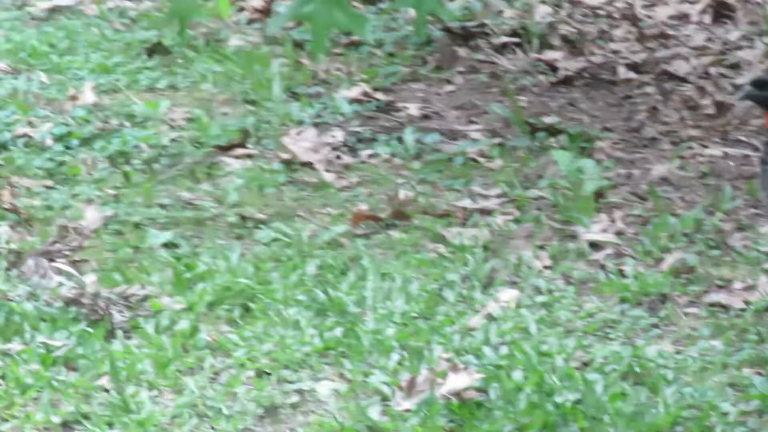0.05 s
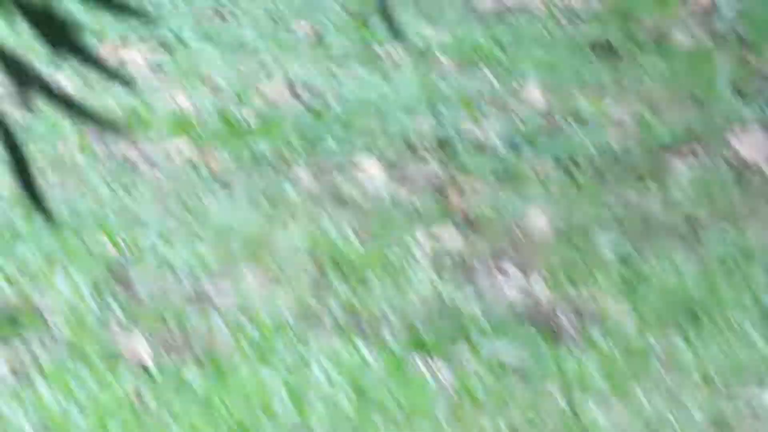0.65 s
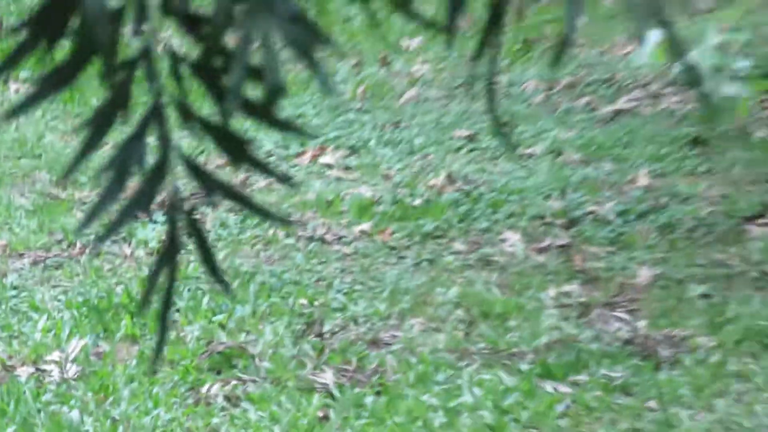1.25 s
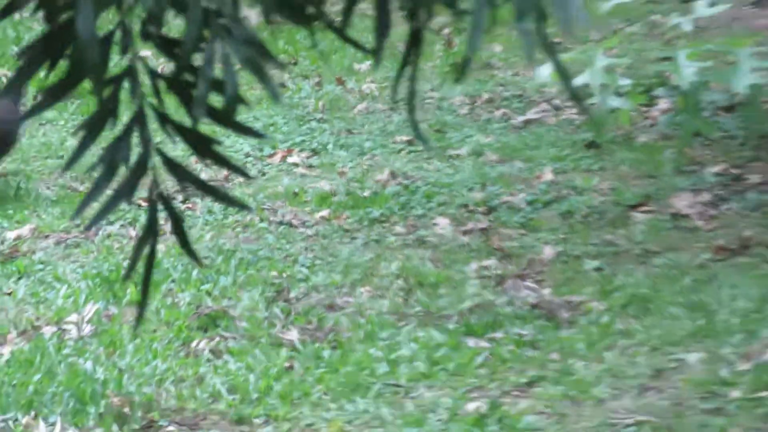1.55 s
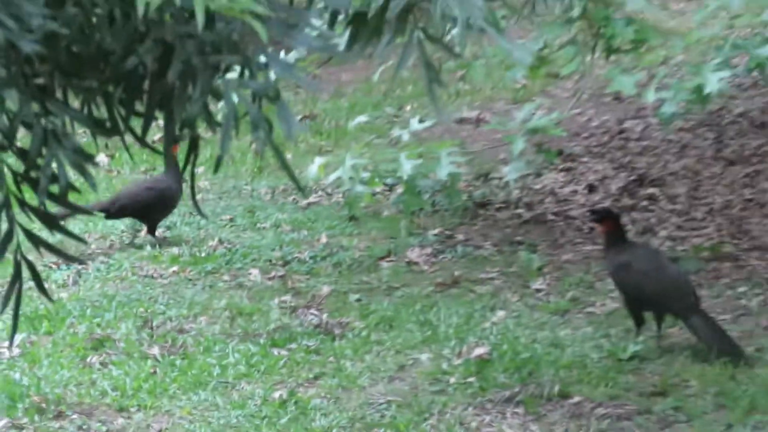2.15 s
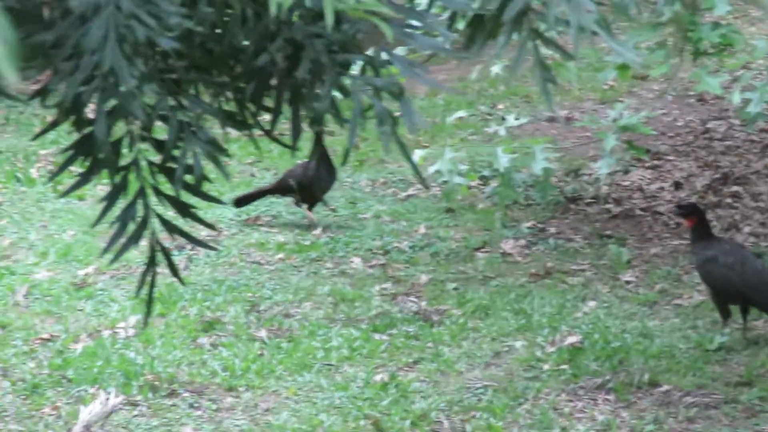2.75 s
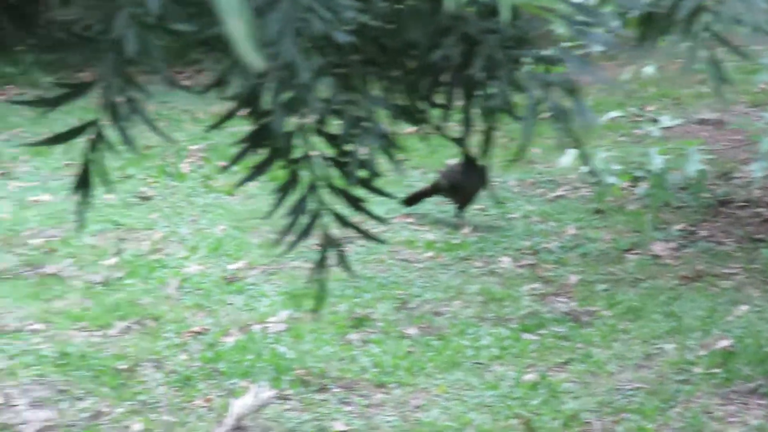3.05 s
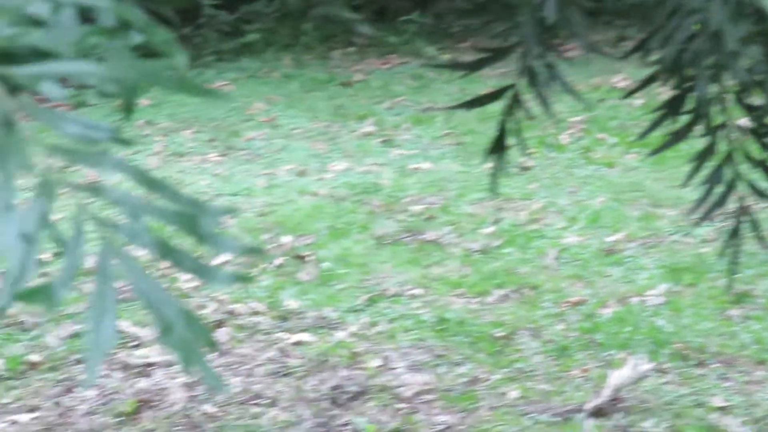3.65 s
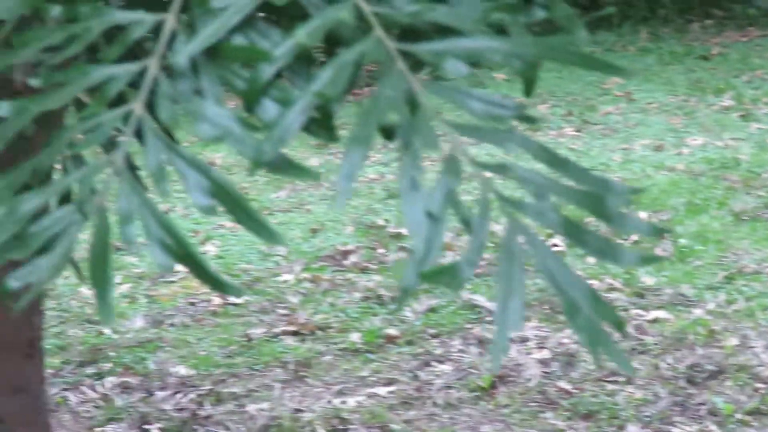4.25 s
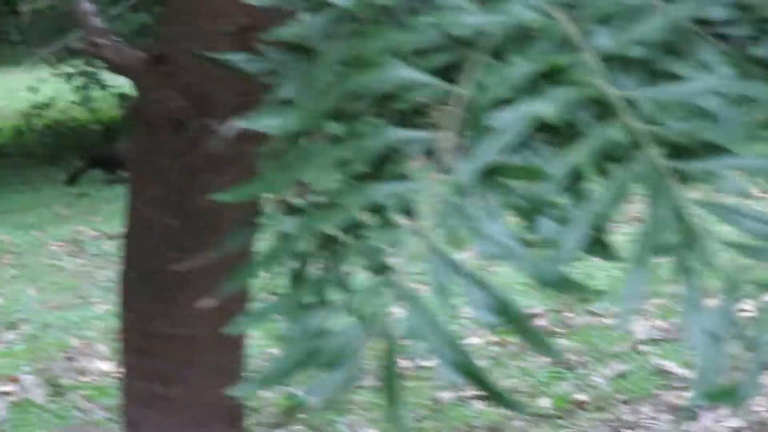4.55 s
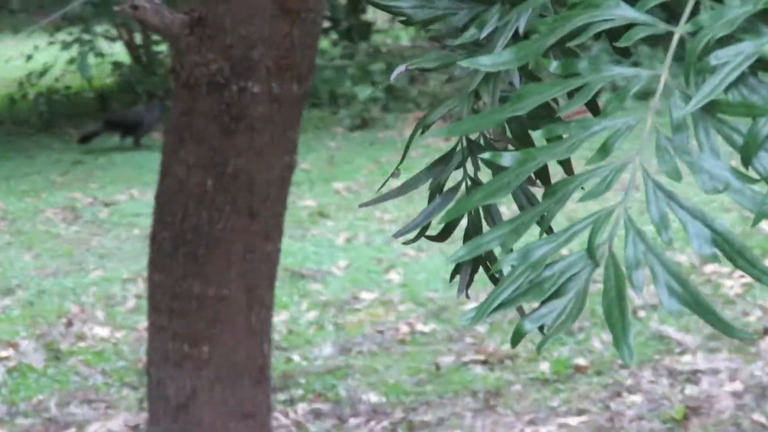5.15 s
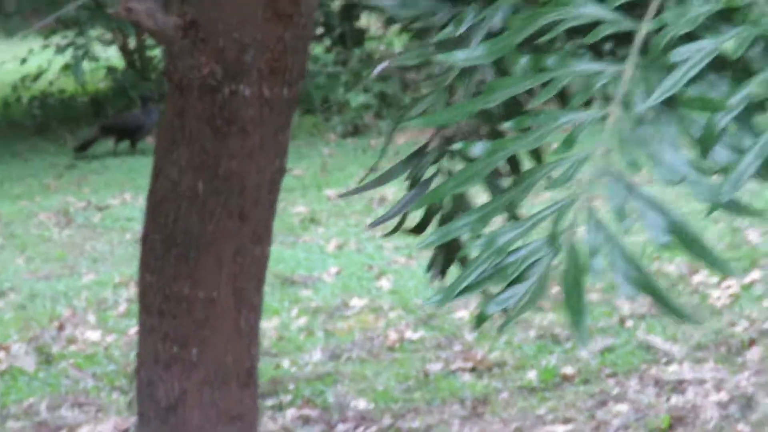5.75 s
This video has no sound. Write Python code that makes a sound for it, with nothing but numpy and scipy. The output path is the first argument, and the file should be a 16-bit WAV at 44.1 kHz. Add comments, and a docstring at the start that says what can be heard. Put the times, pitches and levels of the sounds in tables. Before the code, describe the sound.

Several large ground birds give short, harsh, squeaky squawks in quick bursts outdoors among trees, over faint air and low rumble.

```python
"""Guans call on a lawn among trees, near a hand-held camera. Most calls start as a clean squeak of the syrinx
(one voice, two voices, or a rising wind-up) and break into a harsh rasp as its membranes slap and ring the
throat. Leaves and trunks throw the calls back. A small bird whistles once; fingers knock on the camera, which
rumbles low as it is panned, and its lens motor hisses. Behind them are soft air and the hum of a far engine."""
import sys
import numpy as np
from scipy import signal
from scipy.fft import rfft, irfft, next_fast_len
from scipy.io import wavfile
from scipy.ndimage import uniform_filter1d

SR = 44100
rng = np.random.default_rng(int(sys.argv[2]) if len(sys.argv) > 2 else 0)


def log_audio(samples):
    """Write samples as a 16-bit WAV file to the path given in sys.argv[1]."""
    # one column per channel
    frames = np.atleast_2d(samples).T
    # limit to full scale, then quantise
    limited = np.clip(frames, -1, 1)
    pcm = np.round(limited * 32767).astype(np.int16)
    wavfile.write(sys.argv[1], SR, pcm)


N = 264159
TIME = np.arange(N) / SR


# one-voiced calls: break_s, rasp_length_s, effort_db, pitch_hz, squeak_db
YELPS = [(0.309, 0.046, -22, 1504, -33), (0.591, 0.052, -22, 1170, -27), (.633, .04, -13.5, 1797, -24),
         (0.757, 0.049, -25.5, 1096, -31), (0.824, 0.051, -17.5, 1680, -23),
         (1.23, 0.045, -18, 1214, -29.5), (1.289, .046, -20, 1780, -25), (1.592, .056, -14, 1833, -23.5),
         (1.804, .062, -19.5, 1466, -28), (2.039, 0.056, -20.5, 1680, -27), (2.385, .049, -14, 1805, -21.5),
         (2.634, .05, -18, 1227, -26), (2.759, 0.055, -16.5, 1708, -23.5),
         (2.865, .058, -16.5, 1258, -26.5), (3.781, .046, -16, 1344, -24), (4.896, 0.062, -14.5, 1343, -24),
         (5.927, 0.046, -20.5, 1613, -29.5)]

def yelp(at, length_s, effort_db, pitch_hz, squeak_db, attack=0.42):
    """One voice arches and breaks; the lower it sings, the deeper and gruffer the rasp."""
    height = pitch_hz / 1500
    octaves = np.log2(height)
    arch = squeak(at - .026, at + .0047, (1130 * height ** .435, pitch_hz, .795 * pitch_hz), squeak_db,
                  waver=.008, flutter_db=-.4, swell_db=7, octave_db=-16.5)
    return [arch, *voice_break(at, attack * length_s, (1 - attack) * length_s, effort_db,
                               throat_hz=1490 * height ** .35, gruff_db=-11.5 - 19 * octaves,
                               bite_db=-3 * octaves, voice_db=-8.5)]


# two-voiced calls: break_s, rasp_length_s, effort_db, squeak_db
DUETS = [(.374, .063, -14, -34.5), (0.514, .04, -17, -22.5), (.697, 0.053, -16, -27),
         (1.168, 0.056, -14.5, -20), (1.442, .06, -12, -20.5), (1.661, 0.056, -13, -19.5),
         (1.971, 0.051, -11.5, -23.5), (2.165, 0.056, -18, -26.5), (2.702, .052, -17, -23.5),
         (3.86, 0.052, -19, -27), (4.433, 0.057, -16, -23), (4.97, 0.061, -16, -29.5),
         (5.554, 0.047, -19.5, -30)]

def duet(at, length_s, effort_db, squeak_db, attack=0.29):
    """A high voice arches over a steadier low one; both break into a fast-rising rasp."""
    voices = squeak(at - .022, at + .0123, (1580, 1660, 1440), squeak_db, low_db=-25 + .23 * squeak_db,
                    waver=.0059, flutter_db=.5, sum_db=-10, octave_db=-12.5)
    return [voices, held_low_voice(at, effort_db - 15),
            *voice_break(at, attack * length_s, (1 - attack) * length_s, effort_db,
                         throat_hz=1460, gruff_db=-17, bite_db=1.1, voice_db=-10.5)]


# full calls: break_s, rasp_rise_s, rasp_fall_s, effort_db
SQUAWKS = [(2.53, .011, 0.057, -14.5), (3.103, 0.032, .04, -14.5), (3.293, 0.039, 0.041, -14.5),
           (3.689, 0.019, .047, -13), (4.267, 0.031, 0.041, -12), (4.76, .019, .047, -13),
           (5.378, 0.01, .074, -12.5), (5.965, 0.02, 0.019, -14)]

def squawk(at, rise_s, fall_s, effort_db):
    """Two soft voices climb, flip down to one loud note and break into a rasp."""
    wind_up = squeak(at - .027, at - .0041, (1460, 1640, 1860), high_db=-33, low_db=-34,
                     waver=.018, swell_db=4.5, hoarse_db=1.5, sum_db=-7, octave_db=-9, lead_s=.012)
    drop = squeak(at - .0081, at + .0073, (1240, 1220, 1075), high_db=-22, octave_db=-11.5)
    return [wind_up, drop, held_low_voice(at, effort_db - 11),
            *voice_break(at, rise_s, fall_s, effort_db,
                         throat_hz=1430, gruff_db=-14, bite_db=1.9, voice_db=-9)]


# bare rasps: start_s, length_s, effort_db, throat_hz, gruff_db, edge_db
GRUNTS = [(0.057, .052, -23.5, 1553, -9, -13), (0.957, .164, -25, 1504, -15, -20),
          (1.121, 0.034, -22.5, 1440, -11, -20), (1.406, 0.05, -27, 1270, -10, -12.5),
          (1.933, 0.053, -22.5, 1320, -7.5, -30), (2.425, 0.061, -15.5, 1386, -7.5, -19)]

def grunt(at, length_s, effort_db, throat_hz, gruff_db, edge_db, attack=0.29):
    """The voice is rough from the start."""
    return [rasp(at, attack * length_s, (1 - attack) * length_s, effort_db, throat_hz, gruff_db, edge_db)]


def guans(gain_db=-0.65):
    """All four kinds of call, each a list of (start_s, sound) parts."""
    mix = np.zeros(N)
    for call, table in (yelp, YELPS), (duet, DUETS), (squawk, SQUAWKS), (grunt, GRUNTS):
        for row in table:
            for start_s, sound in call(*row):
                add(mix, start_s, sound)
    return gain_of(gain_db) * mix


def squeak(start_s, end_s, arch_hz, high_db, low_db=-np.inf, waver=.013, flutter_db=2.5, swell_db=3.5,
           sum_db=-12, octave_db=-13, hoarse_db=0, lead_s=.016):
    """The syrinx's two sides sing a high arch and an optional steadier low voice, with sum tones."""
    t = np.arange(start_s - .004, end_s + .004, 1 / SR)
    arch = np.polyfit([0, .5, 1], arch_hz, 2)
    hz = np.polyval(arch, (t - start_s) / (end_s - start_s)) * (1 + waver * wander(len(t), size=70))
    high = phase_of(hz)
    low = phase_of(820 * (hz / 1640) ** .55)
    # overtones weaken as they climb past the throat
    overtones = gain_of(octave_db) * (1200 / hz) ** 3 * (np.sin(2 * high) + np.sin(3 * high) / 4)
    sum_tones = gain_of(sum_db) * (np.sin(high + low) + np.sin(2 * high + low) / 4)
    tone = gain_of(high_db) * (np.sin(high) + overtones) + gain_of(low_db) * (np.sin(low) + sum_tones)
    swell = gain_of(swell_db * np.linspace(-1, 1, len(t)) + flutter_db * wander(len(t), size=60))
    envelope = swell * signal.windows.tukey(len(t), .45)
    sound = np.pad(np.sqrt(2) * tone * envelope, (round(lead_s * SR), 0))
    # the low voice catches hoarsely before it settles
    catch = signal.windows.hann(len(sound) // 2 + len(sound) // 4)
    hoarse = formant(rng.standard_normal(len(catch)), hz=1350, width_hz=1100)
    hoarse = unit_rms(resonate(hoarse, hz=1350, width_hz=1100))
    add(sound, 0, gain_of(low_db + hoarse_db + 3) * catch * hoarse)
    return t[0] - lead_s, sound


def held_low_voice(at, level_db, pitch_hz=795):
    """The low voice holds on briefly under the rasp."""
    return squeak(at + .008, at + .0244, [pitch_hz] * 3, level_db,
                  waver=.024, swell_db=1.5, octave_db=-31)


# harshness, growing as the birds get excited: time_s, edge_db
HARSHNESS = [(.3, -20.5), (1.8, -19), (2.6, -17), (6, -18)]

def voice_break(at, rise_s, fall_s, effort_db, throat_hz, gruff_db, bite_db, voice_db):
    """A rasp with the fading clean voice wobbling down through it."""
    length_s = rise_s + fall_s
    edge_db = np.interp(at, *np.transpose(HARSHNESS)) + bite_db
    glide_hz = throat_hz * np.array([1.14, 1, .908])
    return [rasp(at, rise_s, fall_s, effort_db, throat_hz, gruff_db, edge_db),
            squeak(at + .12 * length_s, at + .715 * length_s, glide_hz, effort_db + voice_db,
                   waver=.05, flutter_db=5, swell_db=.5, octave_db=-29)]


# throat resonances: centre_ratio, width_hz, gain_db
THROAT = [(.8, 353, 2.5), (.98, 371, 2.5), (1.13, 387, 2.5), (1.42, 624, -11)]
# low body of the rasp: freq_hz, density_db
RASP_BODY = [(60, -97.5), (150, 9), (370, 10.5), (470, 4), (640, 13.5), (950, -15), (1500, 4),
             (3000, -42.5)]
# sharp edge of the rasp: freq_hz, density_db
RASP_EDGE = [(1200, -31.5), (2000, 3.5), (2450, 3.5), (3200, -4.5), (4300, -8), (5000, -14), (5700, -14),
             (7500, -24.5), (12000, -37.5)]

def rasp(start_s, rise_s, fall_s, effort_db, centre_hz, gruff_db, edge_db, droop=.22, sag=.086):
    """Membrane slaps and their puffs of air ring the throat and windpipe."""
    t = np.arange(-rise_s, fall_s, 1 / SR)
    progress = np.linspace(0, 1, len(t))
    pressure = abs(np.sin(np.pi / 2 * np.interp(t, [-rise_s, 0, fall_s], [0, 1, 2]))) ** .89
    # the membranes slacken: slower slaps and a falling, gruff ring
    tension = 1 - droop * progress ** 3
    slaps, puffs = membranes(tension)
    drive = slaps + .59 * puffs
    # the throat sinks as the bill closes
    throat_hz = centre_hz * (1 + sag * (1 - 2 * progress))
    throat = steadied(sum((-1) ** k * gain_of(db) * formant(drive, ratio * throat_hz, width_hz)
                          for k, (ratio, width_hz, db) in enumerate(THROAT)))
    # driven hard, it adds overtones of its own ring
    overtones = gain_of(-21) * pressure * unit_rms(throat ** 2 - uniform_filter1d(throat ** 2, size=45))
    ring_hz = 805 * tension * (1 + .11 * wander(len(t), size=300))
    ring = gain_of(gruff_db - 3) * unit_rms(formant(drive, ring_hz, width_hz=260 - 110))
    body = gain_of(gruff_db / 2 - 14) * 2 * progress * colour(drive, RASP_BODY)
    # windpipe resonances follow the throat and differ per call
    hiss = unit_rms(slaps + 2 * puffs)
    pipe_ratios = 1.5 + np.arange(4) + rng.random(4)
    pipe = unit_rms(sum(formant(hiss, ratio * throat_hz, width_hz=260) for ratio in pipe_ratios))
    # the edge is hardest at the break, then fades
    edge = gain_of(edge_db + 5.5 - 5 * progress) * colour(hiss + .3 * pipe, RASP_EDGE) * pressure ** .16
    return start_s, gain_of(effort_db) * pressure * (throat + overtones + ring + body + edge)


def membranes(tension, nominal_hz=400, jitter=.38, uneven_db=1.5, puff_decay_cycles=.74):
    """The syrinx membranes slap irregularly, each slap with a puff of air."""
    count = len(tension)
    pace = rng.uniform(.75, 1.25)
    slap_hz = nominal_hz * pace * tension ** 2 * np.exp(jitter * wander(count, size=60))
    turns = np.cumsum(slap_hz) / SR
    cycle = turns.astype(int)
    strength = gain_of(uneven_db * np.clip(rng.standard_normal(count), -2, 1))[cycle]
    slaps = np.diff(cycle, prepend=-1) * strength
    puffs = strength * np.exp(-(turns % 1) / puff_decay_cycles) * rng.standard_normal(count)
    return unit_rms(slaps), unit_rms(puffs)


# whistle contour: time_s, pitch_hz, level_db
WHISTLE = [(.14, 3980, -62), (.2, 3800, -51.5), (.29, 3480, -52), (.35, 3270, -66)]

def small_bird(flutter_db=2):
    """One thin, unsteady whistle that slides down."""
    time_s, pitch_hz, level_db = np.transpose(WHISTLE)
    contour_db = np.interp(TIME, time_s, level_db, left=-140, right=-140)
    level = gain_of(contour_db + flutter_db * wander(N, size=300))
    return np.sqrt(2) * level * np.sin(phase_of(np.interp(TIME, time_s, pitch_hz)))


# decay among the trees: freq_hz, t60_s
TREE_DECAY = [(200, 0.96), (1200, 0.96), (3500, 0.51), (14000, 0.2)]
# return from far trunks: freq_hz, gain_db
TRUNK_COLOUR = [(500, 2.5), (850, -1.5), (1400, -7.5), (2200, 4), (8000, 12.5)]
# return from near leaves: freq_hz, gain_db
LEAF_COLOUR = [(300, 5), (1200, -2), (4500, 4.5), (9000, 15)]

def trees(x, echo_db=-15, taps_per_s=2500, leaf_decay_s=.013, trunk_onset_s=.01):
    """Near leaves scatter the calls; far trunks return a long, clumpy tail."""
    t, bins_hz = np.arange(SR) / SR, np.fft.rfftfreq(SR, 1 / SR)
    taps = rng.standard_normal((4, SR)) * (rng.random((4, SR)) < taps_per_s / SR)
    hz, age_s, frames = signal.stft(taps[:2], SR, nperseg=256)
    frames = frames * gain_of(-60 * age_s / at_hz(TREE_DECAY, hz)[:, None])
    trunks = signal.istft(frames, SR, nperseg=256)[1][:, :SR]
    trunks *= (1 - np.exp(-(t / trunk_onset_s) ** 2)) * gain_of(wander(SR, size=500))
    trunks /= np.linalg.norm(trunks, axis=1, keepdims=True)
    leaves = taps[2:] * np.exp(-t / leaf_decay_s)
    leaves /= np.linalg.norm(leaves, axis=1, keepdims=True)
    far = rfft(trunks) * gain_of(echo_db + at_hz(TRUNK_COLOUR, bins_hz))
    near = rfft(leaves) * gain_of(echo_db + at_hz(LEAF_COLOUR, bins_hz))
    mid, side = irfft(far * [[1], [.25]] + near, SR)
    return signal.fftconvolve(x[None], np.array([mid + side, mid - side]), axes=1)[:, :N]


def moving_echoes(x, stay_s=.549, count=3):
    """Birds and camera keep moving, so one set of echoes hands over to the next."""
    offsets = [abs((TIME / stay_s - k + count / 2) % count - count / 2) for k in range(count)]
    return sum(trees(x * np.cos(np.pi / 2 * np.minimum(offset, 1))) for offset in offsets)


def earlier_calls(level_db=-39, t60_s=1.0):
    """The tail of an earlier call dies away among the trees."""
    # freq_hz, density_db
    spectrum = [(60, -17), (300, -2), (600, 5), (950, -3), (1500, 4),
                (2500, -11), (5000, -22), (12000, -54)]
    return gain_of(level_db - 60 * TIME / t60_s) * stereo_noise(spectrum, AIR_COHERENCE)


# finger knocks: start_s, relative_db
KNOCKS = [(0.918, -36), (1., -32), (1.031, -36), (1.052, -34.5), (1.084, -31), (1.144, -28.5),
          (1.329, -38.5)]
# camera body modes: freq_hz, gain_db, t60_s
CASE_MODES = [(284, -9, 0.061), (385.5, 6, 0.052), (576, -10, 0.024)]

def handling_knocks(gain_db=-9, lean_db=5, push_s=.0027):
    """Soft finger knocks ring the camera body, nearer the left port."""
    t, knocks = np.arange(SR // 5) / SR, np.zeros(N)
    ring = sum(gain_of(db - 60 * t / t60_s) * np.cos(2 * np.pi * hz * t) for hz, db, t60_s in CASE_MODES)
    for start_s, db in KNOCKS:
        push = uniform_filter1d(rng.standard_normal(len(t)), size=40) * t * np.exp(-t / push_s)
        add(knocks, start_s, gain_of(db + gain_db) * unit_rms(signal.fftconvolve(push, ring)[:len(t)]))
    return knocks * gain_of([[lean_db], [-lean_db]])


# motor runs: start_s, end_s, level_db
LENS_RUNS = [(1.081, 1.95, -49), (3.477, 3.68, -55.5), (5.81, 6.0, -46)]
# motor hiss: freq_hz, density_db
LENS_HISS = [(1500, 9), (4300, 7.5), (5300, 1.5), (8500, -1.5), (11500, 2), (14000, -6)]

def lens_motor(rise_db_per_s=170, fall_db_per_s=130):
    """The lens motor hisses while it moves."""
    level = np.zeros(N)
    for start_s, end_s, db in LENS_RUNS:
        before_s, after_s = np.maximum(start_s - TIME, 0), np.maximum(TIME - end_s, 0)
        level += gain_of(db - rise_db_per_s * before_s - fall_db_per_s * after_s)
    return level * stereo_noise(LENS_HISS, coherence=[(1000, .9), (12000, .3)])


# engine hum: time_s, relative_db
ENGINE_LEVEL = [(0.0, -50), (1.28, -43), (2.02, -51), (5.99, -45.5)]

def far_engine(pitch_hz=164.9, gain_db=-3.5):
    """A far engine's hum wavers in one narrow band."""
    hum = steadied(formant(rng.standard_normal(N), pitch_hz, width_hz=11), size=9000)
    return hum * gain_of(gain_db + np.interp(TIME, *np.transpose(ENGINE_LEVEL)))


# rumble contour: time_s, level_db
RUMBLE_LEVEL = [(0, -47), (1.3, -48), (2.1, -59), (4.2, -61.5), (4.8, -47.5), (6, -55.5)]
# rumble spectrum: freq_hz, density_db
RUMBLE_SPECTRUM = [(35, -26), (70, -5), (100, -1.5), (140, -5.5), (400, -22), (1500, -71)]
# air spectrum: freq_hz, density_db
AIR_SPECTRUM = [(20, -31), (50, -2), (100, 1), (300, 1.5), (1400, -10), (4000, -18.5), (8000, -29),
                (14000, -35.5)]
# left-right likeness outdoors: freq_hz, coherence
AIR_COHERENCE = [(70, 1), (170, 0.87), (320, 0.52), (900, 0.93), (3000, 0.8), (9000, 0.14)]

def air_and_rumble(air_db=-46):
    """Soft, steady air, with a low rumble from the camera being panned in the hand that comes and goes."""
    rumble_db = np.interp(TIME, *np.transpose(RUMBLE_LEVEL))
    rumble = gain_of(rumble_db) * stereo_noise(RUMBLE_SPECTRUM, AIR_COHERENCE)
    return rumble + gain_of(air_db) * stereo_noise(AIR_SPECTRUM, AIR_COHERENCE)


def gain_of(db):
    return 10 ** (np.asarray(db) / 20)


def phase_of(hz):
    return 2 * np.pi * np.cumsum(hz) / SR


def unit_rms(x):
    return x / np.sqrt(np.mean(x ** 2) + 1e-20)


def at_hz(points, hz):
    """Interpolates on a log-frequency axis."""
    freq_hz, value = np.transpose(points)
    return np.interp(np.log(hz + 1), np.log(freq_hz + 1), value)


def add(mix, start_s, sound):
    part = mix[max(round(start_s * SR), 0):][:len(sound)]
    part += sound[:len(part)]


def colour(x, spectrum, size=2048):
    """Minimum-phase filter; output rms 1."""
    log_gain = np.log(gain_of(at_hz(spectrum, abs(np.fft.fftfreq(size, 1 / SR)))))
    taps = np.fft.ifft(np.exp(signal.hilbert(log_gain).conj())).real
    return unit_rms(signal.fftconvolve(x, taps[:size // 2])[:len(x)])


def resonate(x, hz, width_hz):
    """Unity-gain resonance that follows hz."""
    carrier = np.exp(1j * phase_of(hz * np.ones(len(x))))
    pole = np.exp(-np.pi * width_hz / SR)
    return 2 * (carrier * signal.lfilter([1 - pole], [1, -pole], x / carrier)).real


def formant(x, hz, width_hz):
    """Steep-sided resonance."""
    return resonate(resonate(x, hz, width_hz), hz, width_hz)


def smooth(x, size):
    return uniform_filter1d(uniform_filter1d(x, size), size)


def wander(count, size):
    """Random drift over size samples; rms 1."""
    return unit_rms(smooth(rng.standard_normal(count), size))


def steadied(x, size=700):
    """Holds the slow level at 1, keeps the fast flutter."""
    return x / np.sqrt(smooth(x ** 2, size) + 1e-12)


def stereo_noise(spectrum, coherence):
    """Shaped noise with a given left-right likeness; rms 1."""
    size = next_fast_len(N, True)
    hz = np.fft.rfftfreq(size, 1 / SR)
    left, other = rfft(rng.standard_normal((2, size)))
    shared = np.clip(at_hz(coherence, hz), -1, 1)
    right = shared * left + np.sqrt(1 - shared ** 2) * other
    return unit_rms(irfft(np.array([left, right]) * gain_of(at_hz(spectrum, hz)), size)[:, :N])


def scene():
    """Birds and their echoes, over the background and camera noises."""
    birds = guans() + small_bird()
    outdoors = birds + moving_echoes(birds) + earlier_calls() + far_engine() + air_and_rumble()
    return outdoors + handling_knocks() + lens_motor()


def record(dry, rolloff_hz=12800, cutoff_hz=15100):
    """Microphone treble roll-off, then a steep band limit."""
    soft = signal.sosfilt(signal.butter(4, rolloff_hz, fs=SR, output="sos"), dry)
    band_limit = signal.firwin(511, cutoff_hz, window=("kaiser", 9), fs=SR)
    return signal.oaconvolve(soft, band_limit[None], "same")


dry = scene()
out = record(dry)
log_audio(out)
```